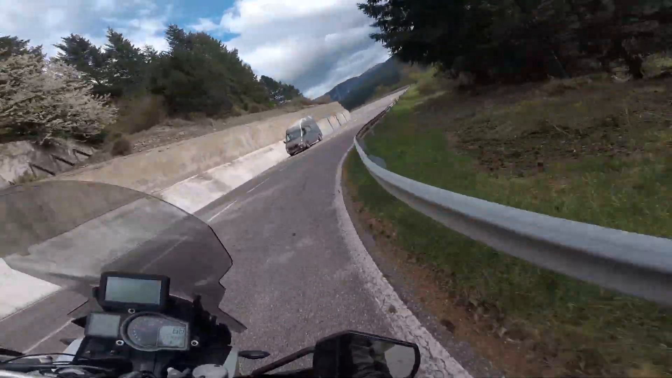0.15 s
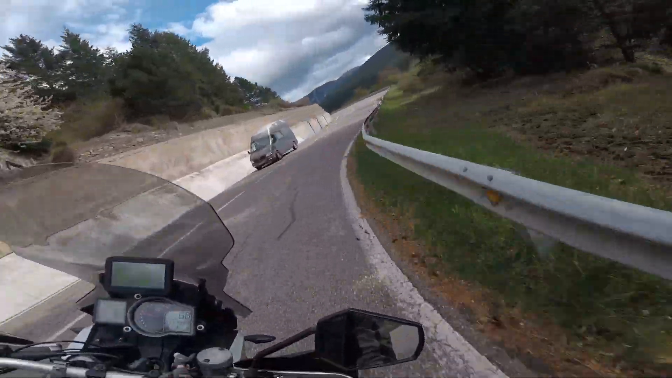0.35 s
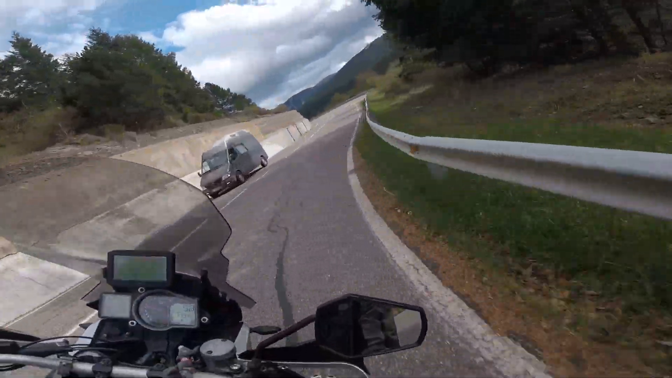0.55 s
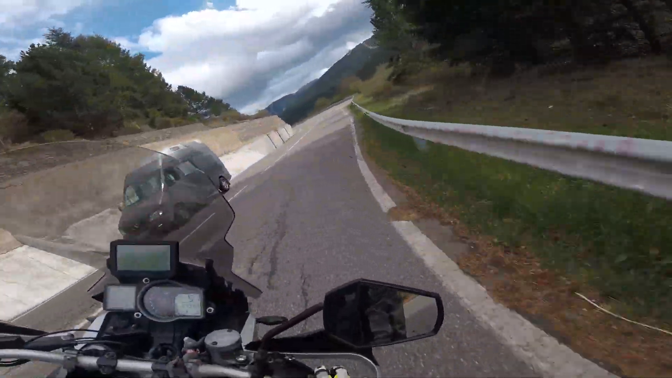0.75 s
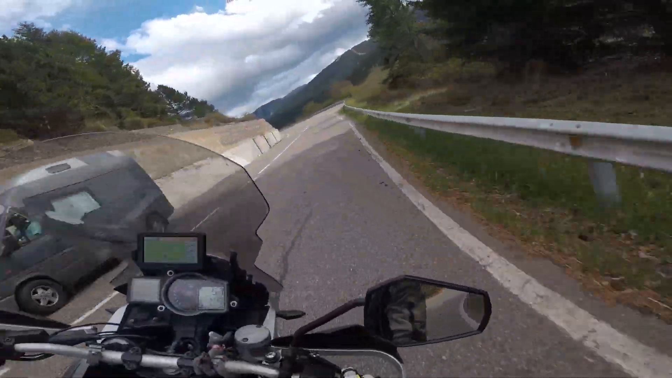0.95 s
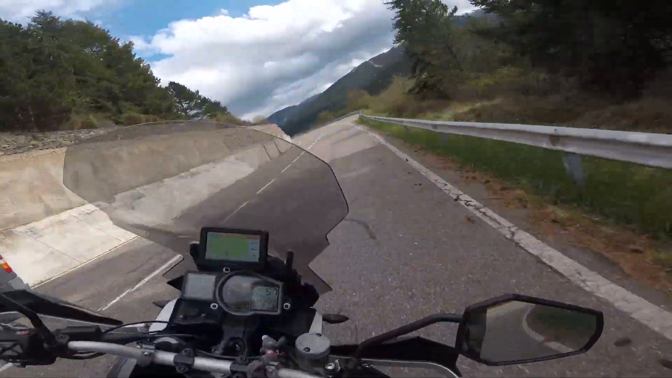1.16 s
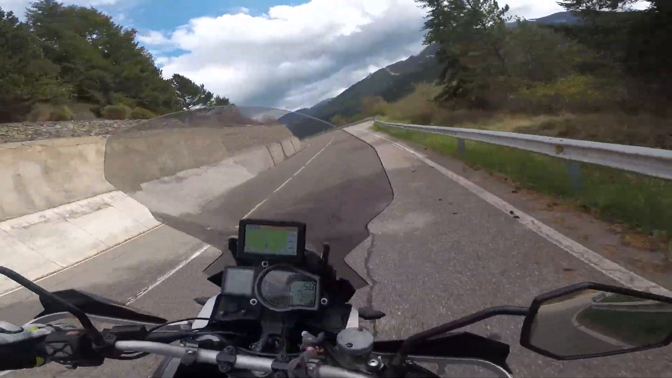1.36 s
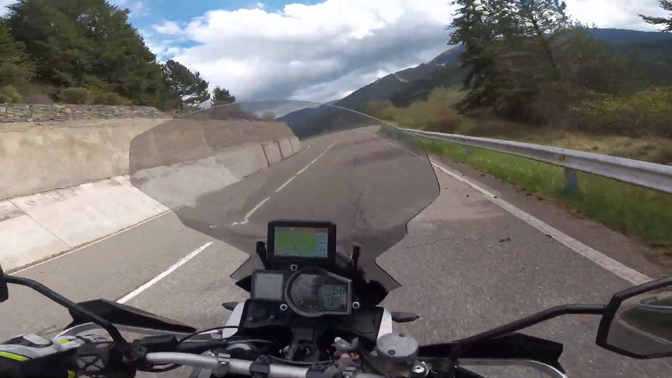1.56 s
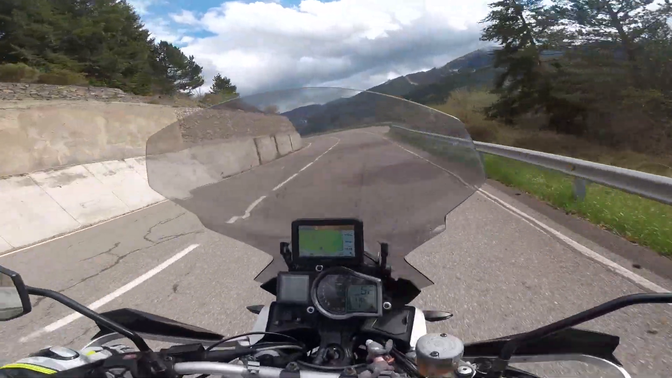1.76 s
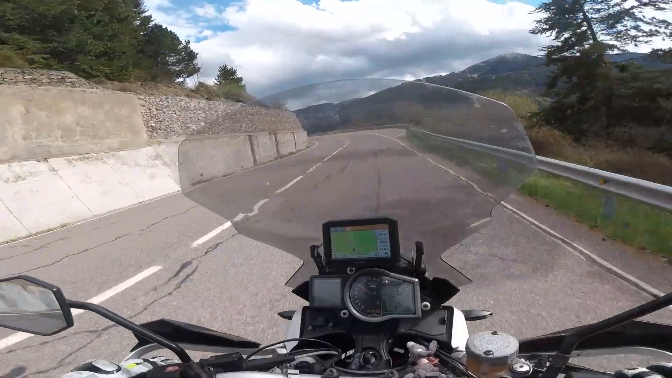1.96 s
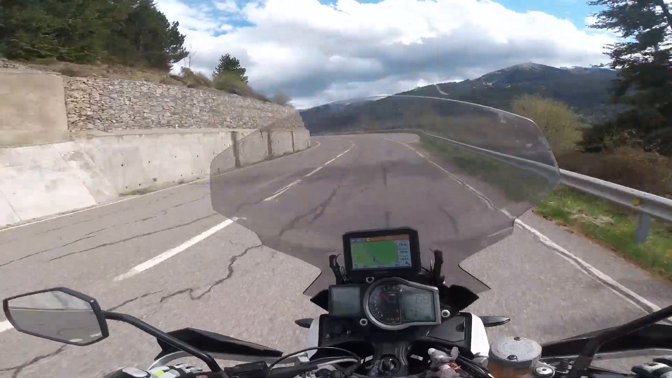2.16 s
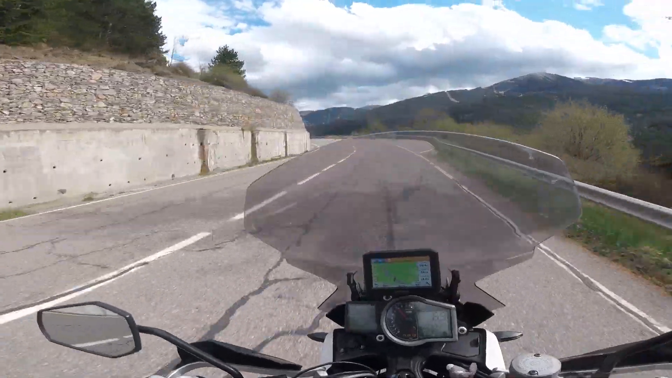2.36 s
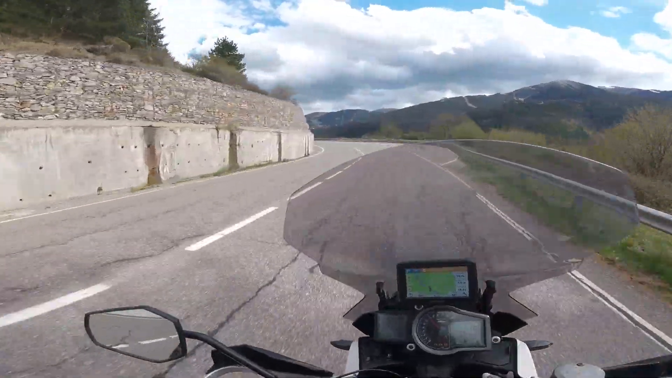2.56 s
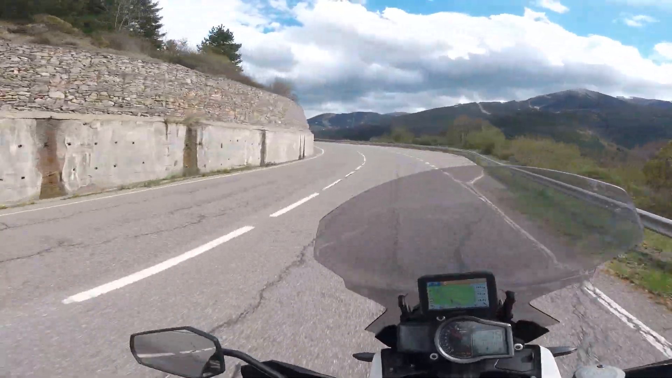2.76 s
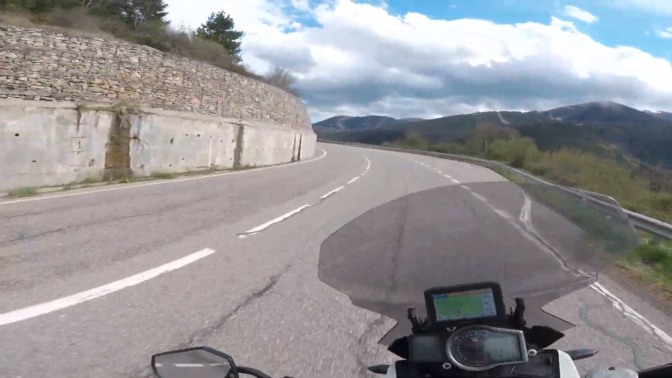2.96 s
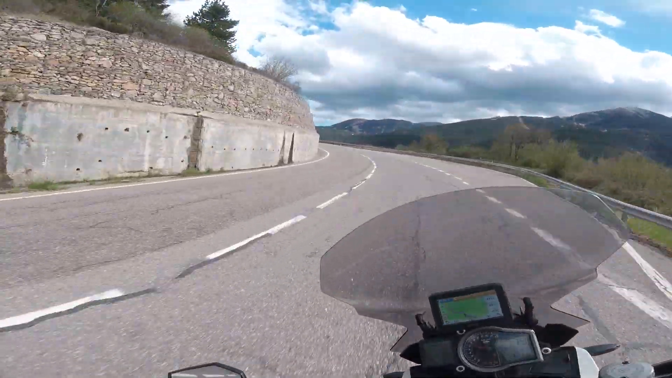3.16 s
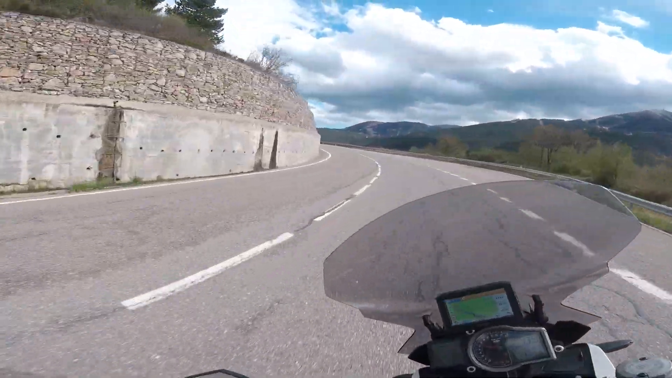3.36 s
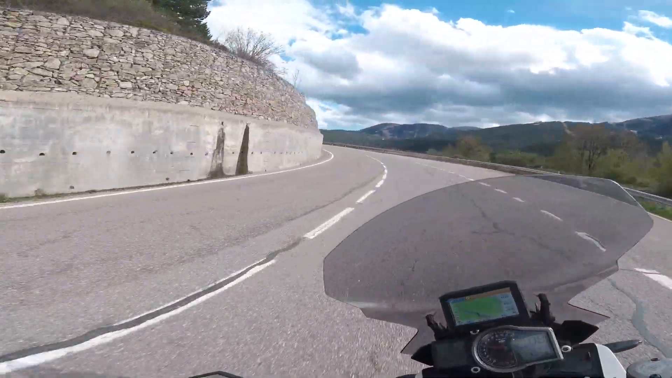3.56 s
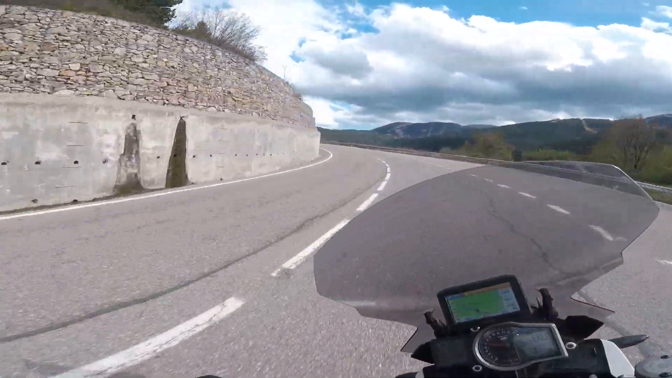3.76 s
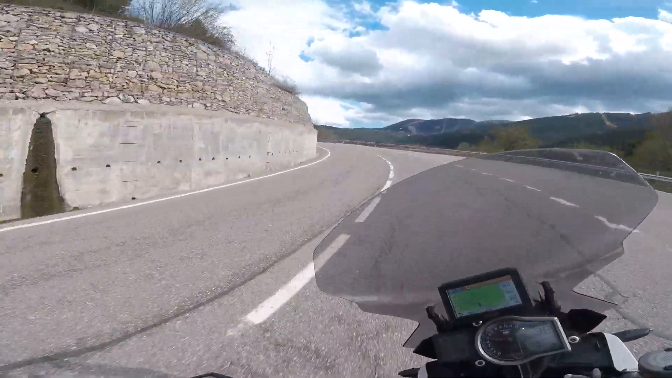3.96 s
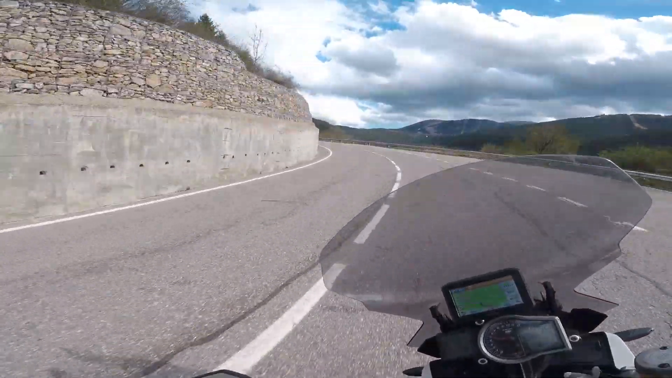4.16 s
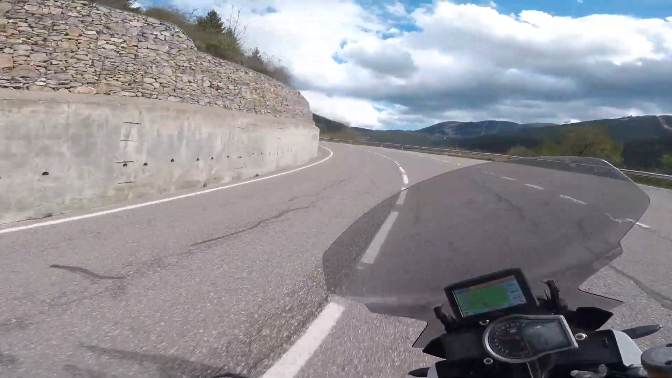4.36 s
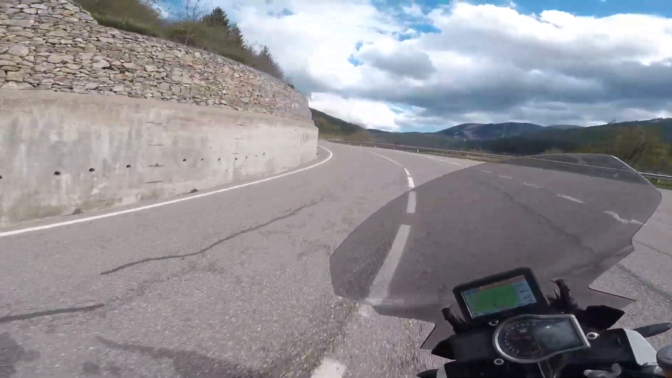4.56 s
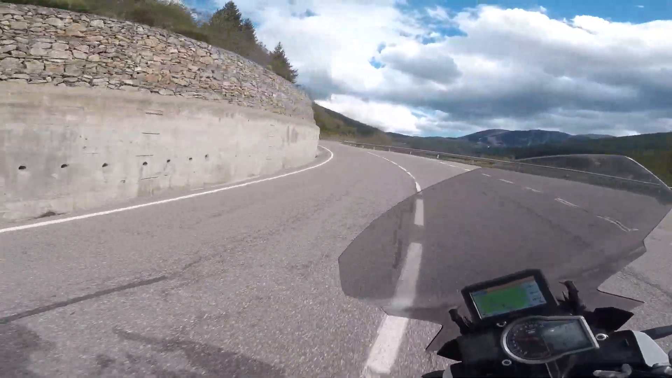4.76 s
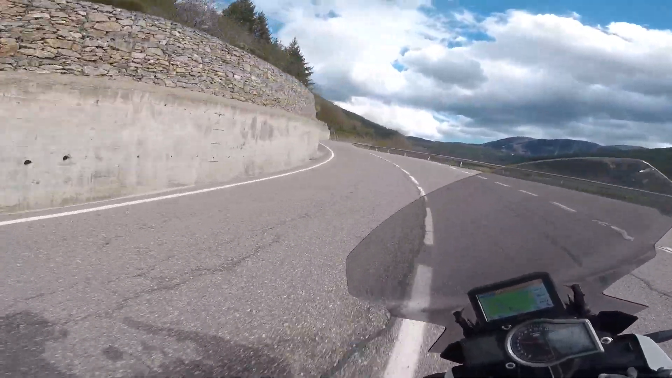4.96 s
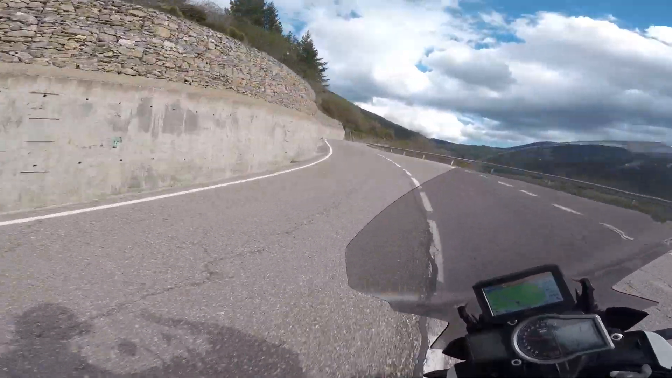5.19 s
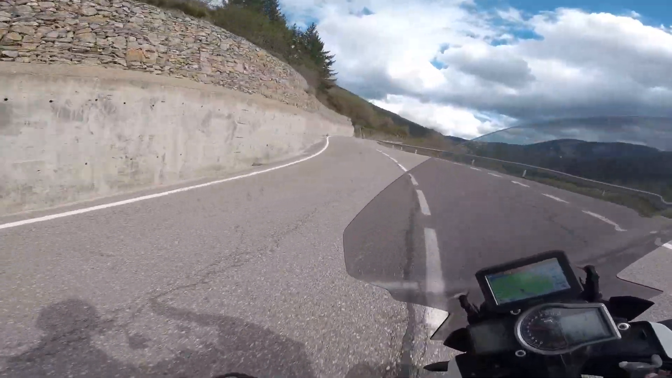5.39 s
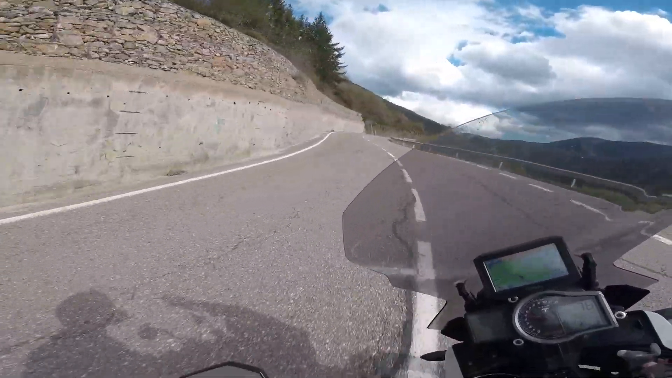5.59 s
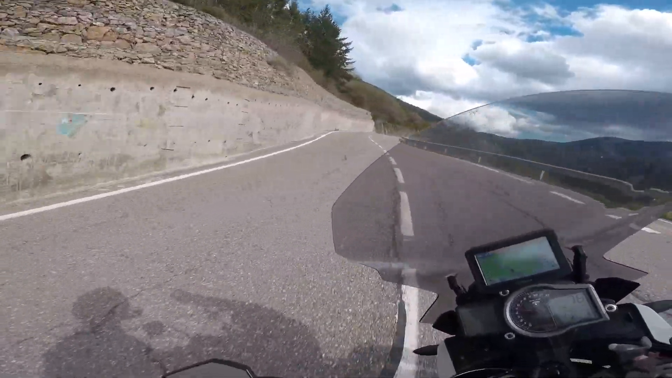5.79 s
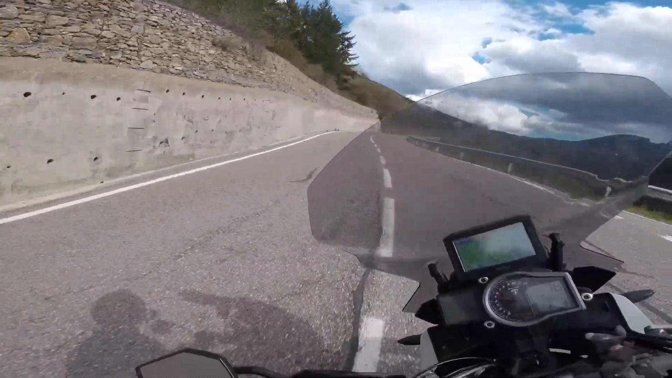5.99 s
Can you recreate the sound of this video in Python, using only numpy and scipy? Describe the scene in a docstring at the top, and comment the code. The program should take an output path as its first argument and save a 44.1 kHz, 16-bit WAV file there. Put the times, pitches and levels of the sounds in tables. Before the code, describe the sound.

From the rider's seat, a big V-twin motorcycle starts on a low, lumpy throb and accelerates hard, growing to a raspy bark. The throttle snaps shut, the gearbox thuds and exhaust pops scatter as revs drop. It coasts with a soft burble through an open mountain bend, tyres rushing and wind thumping the microphone, then the throttle opens again at steady low revs.

```python
"""A 75-degree V-twin motorcycle heard from the rider's seat pulls hard, shifts up, coasts and picks up again.
Two unevenly spaced gas pulses a cycle ring modes of the silencer, tailpipe, headers, heat shield and airbox.
Shaped noise gives the gas rasp behind each pulse, the overrun sputter, tyre rush, wind and wall hiss.
Rung impulses pop in the exhaust near throttle changes; decaying noise bursts thud and click in the gearbox.
Brief resonant swells follow the gas pulses; low, soft thumps buffet the microphone."""
import sys
import numpy as np
from scipy import signal
from scipy.fft import rfft, irfft, next_fast_len
from scipy.io import wavfile
from scipy.ndimage import uniform_filter1d

SR = 44100
rng = np.random.default_rng(int(sys.argv[2]) if len(sys.argv) > 2 else 0)


def master_out(mix):
    """Clip the mix to full scale and print it as 16-bit PCM to the path in sys.argv[1]."""
    frames = np.transpose(np.atleast_2d(mix))
    ceiling = np.clip(frames, -1, 1)
    pcm = np.round(ceiling * 32767).astype(np.int16)
    wavfile.write(sys.argv[1], SR, pcm)


N = 265923
TIME = np.arange(N) / SR
REAR_LAG_CYCLES = 285 / 720  # front cylinder's pulse to the rear one's
MIN_OPENING = 0.01  # keeps the logarithms finite
LEFT_RIGHT = np.array([[1], [-1]])

# engine speed, rocking on the drive chain at load changes: (time [s], four-stroke cycle rate [Hz])
ENGINE_SPEED = [(0.0, 34.96), (0.12, 35.22), (0.22, 37.82), (0.29, 33.82), (0.35, 36.2), (0.43, 35.28),
                (0.55, 36.31), (0.64, 36.72), (0.96, 40.4), (1.16, 44.23), (1.22, 43), (1.3, 45.8),
                (1.37, 45.48), (1.46, 47.64), (1.66, 49.52), (1.73, 51.24), (1.79, 51.55), (2.0, 55.3),
                (2.06, 56.1), (2.33, 56.75), (2.46, 48.5), (2.6, 39.63), (2.65, 43.48), (2.69, 41.14),
                (2.76, 42.6), (3.2, 41.95), (3.62, 40.71), (3.69, 40.76), (3.8, 40.27), (3.96, 40.9),
                (4.04, 39.7), (4.9, 38.5), (5.5, 38.87), (5.8, 39.33), (6.03, 40.15)]


def undb(db):
    """Decibels to gain."""
    return 10 ** (np.asarray(db) / 20)


def curves(table):
    """Each column of a table, joined by straight lines in time."""
    s, *columns = np.transpose(table)
    return [np.interp(TIME, s, column) for column in columns]


def noise(colour):
    """Noise of rms 1 with the given spectrum, interpolated in dB over log frequency."""
    hz, db = np.transpose(colour)
    size = next_fast_len(N, True)
    bins_hz = np.maximum(np.fft.rfftfreq(size, 1 / SR), 1)
    gain = undb(np.interp(np.log(bins_hz), np.log(hz), db))
    x = irfft(rfft(rng.standard_normal(size)) * gain, size)[:N]
    return x / x.std()


def walk(rate_hz):
    """Slow random curve with a spread near 1."""
    hold = int(SR / rate_hz)
    steps = np.repeat(rng.standard_normal(N // hold + 1), hold)
    smooth = uniform_filter1d(uniform_filter1d(steps, hold), hold)
    return 1.3 * smooth[:N]


def ring(x, hz, width_hz):
    """One resonance, gain 1 at its centre."""
    return signal.lfilter(*signal.iirpeak(hz, hz / width_hz, fs=SR), x)


def lowpass(x, hz, order):
    """Butterworth roll-off above hz."""
    return signal.sosfilt(signal.butter(order, hz, fs=SR, output="sos"), x)


def spread(colour, width, wide_hz):
    """Stereo noise: the bass is alike in both channels, the treble less so."""
    side = noise(colour)
    side = side - 0.85 * lowpass(side, wide_hz, order=1)
    return noise(colour) + width * side * LEFT_RIGHT


def controls():
    """Throttle opening (0-1) and revs in octaves above cruising."""
    # rider's hand: wide open, shut for the upshift and bend, fed back in: (time [s], opening [0-1])
    hand = [(0.0, 0), (0.15, 0.27), (0.27, 0.28), (0.6, 0.41), (0.77, 0.54), (1.0, 0.69), (1.09, 0.8),
            (1.35, 0.85), (1.7, 0.91), (2.05, 0.89), (2.19, 0.82), (2.32, 0.66), (2.44, 0.01), (3.66, 0.01),
            (3.8, 0.04), (3.96, 0.118), (4.1, 0.08), (4.65, 0.04), (5.12, 0.34), (5.68, 0.45), (6.03, 0.55)]
    cruise_hz = 40
    throttle, = curves(hand)
    cycle_hz, = curves(ENGINE_SPEED)
    return np.clip(throttle, 0, 1), np.log2(cycle_hz / cruise_hz)


def unevenness():
    """Scatter of pulse size in dB, largest at barely open throttle where the mixture burns badly."""
    base_db, stumble_db = -0.11, 1.5
    stumble_opening, stumble_width = 0.024, 0.18
    throttle, _ = controls()
    return base_db + stumble_db * np.exp(-((throttle - stumble_opening) / stumble_width) ** 2)


def clutch_unloading_db():
    """Drop of boom and hum as the clutch unloads the engine in mid-shift."""
    centre_s, half_s, drop_db = 2.526, 0.12, 2.5
    return drop_db * np.exp(-((TIME - centre_s) / half_s) ** 2)


def pulses(cycle, offset, scatter_db, burn):
    """One pulse per engine cycle, of unit area (in cycles) before uneven burning scales it."""
    marks = np.arange(int(cycle[-1]) + 1) + offset
    at = np.interp(marks[marks < cycle[-2]], cycle, np.arange(N))
    i = at.astype(int)
    area = undb(burn[:len(i)] * scatter_db[i]) / np.diff(cycle)[i]
    # share each pulse between its two neighbouring samples
    early = np.bincount(i, area * (1 - at + i), N)
    late = np.bincount(i + 1, area * (at - i), N)
    return early + late


def duct(modes, cycle, offset, drive_db, burns, edge_hz, turbulence):
    """Both cylinders ring a duct; a short puff of turbulent flow trails each pulse."""
    scatter_db = unevenness()
    sources = []
    for lag, burn in zip((0, REAR_LAG_CYCLES), burns.T):
        kick = pulses(cycle, offset + lag, scatter_db, burn) * undb(drive_db)
        puff = lowpass(kick, 40, order=1) * rng.standard_normal(N)
        sources.append(kick + turbulence * puff)
    front, rear = sources
    rung = sum(ring(a * front + b * rear, hz, width_hz) for hz, width_hz, a, b in modes)
    return lowpass(rung, edge_hz, order=4)


def boom_drive():
    """Silencer drive in dB: rises with revs, falls with load, dips at half throttle."""
    coast_db, db_per_octave, half_throttle_dip_db, load_drop_db = -37, 24, 3, 5.5
    throttle, revs = controls()
    load_db = half_throttle_dip_db * np.sin(np.pi * throttle) + load_drop_db * throttle
    return coast_db + db_per_octave * revs - load_db - clutch_unloading_db()


def drone_drive():
    """Tailpipe drive in dB: rises with throttle opening, falls with revs."""
    full_db, db_per_doubling, fall_db_per_octave = -26, 13.5, 24.5
    throttle, revs = controls()
    opening_octaves = np.log2(np.maximum(throttle, MIN_OPENING))
    return full_db + db_per_doubling * opening_octaves - fall_db_per_octave * revs


def bark_drive():
    """Header drive in dB: climbs with the throttle up to a full-bark opening."""
    full_db, full_opening, range_db = -26.5, 0.849, 61.5
    throttle, _ = controls()
    return full_db - range_db * np.maximum(1 - throttle / full_opening, 0)


def exhaust(cycle):
    """Blowdown rings headers, heat shield and tailpipe; the piston's push booms in the silencer later."""
    # duct resonances:
    # (centre [Hz], width [Hz], front-cylinder coupling [signed gain], rear-cylinder coupling [signed gain])
    silencer_modes = [(68.3, 25.3, 0.99, 0.63), (91.4, 109, -0.42, -0.172), (176.4, 54, 0.54, -0.15),
                      (216.3, 44.4, -0.74, 0.87), (225.2, 37.5, 0.49, -1.214), (262.9, 25.3, -0.48, 0.067),
                      (397.6, 68.3, 0.62, 0.324), (405.8, 45.3, -0.73, -0.33), (456.3, 21, 0.081, 0.14),
                      (588, 25, 0.034, -0.039)]
    tailpipe_modes = [(68.5, 28, 0.31, -0.1), (120, 38, -0.34, 0.26), (242, 97, -0.21, 0.28),
                      (300.2, 49.6, -0.52, -0.83), (364.9, 35.2, -0.71, -1.1), (381, 37.5, 0.709, 0.28),
                      (525, 44, 0.25, -0.0023), (557.5, 8.7, 0.23, -0.3), (581.4, 45, -0.14, -0.15),
                      (708.3, 35, 0.29, 0.18), (846, 28, 0.012, 0.043), (1040, 110, -0.035, -0.009)]
    header_modes = [(124, 16, -0.3, -0.13), (187.6, 113, 0.51, 0.19), (215.6, 71.6, -0.74, -0.6),
                    (365, 27, -0.33, 0.26), (436, 56, -0.086, -0.24), (590, 282, -0.24, 0.0066),
                    (654, 97, -0.26, -0.25), (675.3, 218, 0.63, 0.43), (708, 131, -0.415, -0.34),
                    (856, 35, -0.024, -0.027), (1000, 90, -0.028, -0.003), (1101, 94, 0.042, 0.032),
                    (1310, 207, -0.017, -0.001), (1930, 73, 0.0066, 0.042)]
    shield_modes = [(1124, 49, -.02, -.012), (1195, 64, -.011, -0.0018), (1306, 71, -.007, -.005),
                    (1460, 140, -.003, -.002), (1810, 45, -0.0042, -.004), (1880, 35, -.003, 0.0035)]
    boom_at, drone_at, bark_at = 0.22, 0.087, 0.097  # cycles
    bark_db = bark_drive()
    burns = rng.standard_normal((int(cycle[-1]) + 1, 2))  # each firing's luck, per cylinder
    boom = duct(silencer_modes, cycle, boom_at, boom_drive(), burns, edge_hz=1170, turbulence=0.71)
    drone = duct(tailpipe_modes, cycle, drone_at, drone_drive(), burns, edge_hz=860, turbulence=0.098)
    bark = duct(header_modes, cycle, bark_at, bark_db, burns, edge_hz=970, turbulence=0.35)
    buzz = duct(shield_modes, cycle, bark_at, bark_db, burns, edge_hz=2800, turbulence=0.1)
    return boom + drone + bark + buzz


def airbox(cycle):
    """Pulses ring the airbox modes; the hum fades as the throttle opens wide."""
    # airbox resonances:
    # (centre [Hz], width [Hz], front-cylinder coupling [signed gain], rear-cylinder coupling [signed gain])
    airbox_modes = [(98, 28, 0.051, 0.91), (232.4, 18, -1.45, 0.8), (262.3, 18.2, 1.293, -1.4),
                    (333, 30, -0.36, -0.4), (346, 13, 0.38, -0.16), (560, 54, 0.11, 0.16)]
    base_db, db_per_octave, load_drop_db = -34.5, 23, 27.5
    half_gain_opening, draw_at_cycles = 0.076, 0.2204
    throttle, revs = controls()
    flow = np.maximum(throttle, MIN_OPENING)
    opening_db = 20 * np.log10(flow / (flow + half_gain_opening)) - load_drop_db * throttle
    hum_db = base_db + db_per_octave * revs + opening_db - clutch_unloading_db()
    burns = rng.standard_normal((int(cycle[-1]) + 1, 2))
    return duct(airbox_modes, cycle, draw_at_cycles, hum_db, burns, edge_hz=684, turbulence=0.3)


def sputter():
    """With the throttle shut, stray charges burn late in the pipe in soft, irregular puffs."""
    # sputter spectrum: (frequency [Hz], density [dB per Hz])
    sputter_colour = [(250, -18), (450, 2), (850, -9), (1300, -16), (2200, -31), (3000, -29.5), (4200, -37),
                      (8000, -58.5)]
    level_db, scatter_db, stop_opening = -53.5, 1, 0.028
    throttle, _ = controls()
    puffs = undb(scatter_db * np.minimum(walk(90), 2))
    shut = np.exp(-(throttle / stop_opening) ** 2)
    return noise(sputter_colour) * puffs * undb(level_db) * shut


def rasp(cycle):
    """Gas hisses past each opening exhaust valve and decays within the cycle; the headers ring in it."""
    # gas spectrum: (frequency [Hz], density [dB per Hz])
    gas_colour = [(150, -21), (400, -12), (800, 3), (1150, 8), (1500, -7), (1830, -7.5), (2150, -13),
                  (3200, -20), (5000, -24), (7300, -35), (8600, -32.5), (10000, -42.5), (12000, -41.5),
                  (14000, -56.5)]
    full_db, range_db, fall_db_per_octave = -42, 32.5, 5
    opens_at_cycles, decay_cycles, steady, rear_share = 0.1, 0.32, 0.12, 0.48
    whistle_hz, whistle_width_hz, whistle_db, whistle_db_per_octave = 1820, 90, -14, 38
    closing_lag_s = 0.042
    gate = steady
    for lag, share in ((0, 1), (REAR_LAG_CYCLES, rear_share)):
        age_cycles = (cycle - opens_at_cycles - lag) % 1
        gate = gate + share * np.exp(-age_cycles / decay_cycles)
    gate = lowpass(gate, 700, order=1)
    gate = gate / np.sqrt(np.mean(gate ** 2))
    throttle, revs = controls()
    # flow follows an opening throttle at once, a closing one late
    flow = np.maximum(throttle, lowpass(throttle, 1 / (2 * np.pi * closing_lag_s), order=1))
    level_db = full_db - range_db * (1 - flow) - fall_db_per_octave * revs
    gas = spread(gas_colour, width=0.55, wide_hz=1900) * gate * undb(level_db)
    whistle = ring(gas, whistle_hz, whistle_width_hz)
    return gas + undb(whistle_db + whistle_db_per_octave * revs) * whistle


def wind():
    """Low-frequency noise whose level follows the wind and flutters in quick gusts."""
    # wind on the microphone: (time [s], level [dB])
    wind_levels = [(0, -57), (.6, -49.5), (1.5, -46), (2.5, -49), (3.05, -37.5), (3.6, -42), (4.35, -46.5),
                   (4.55, -44), (6.03, -40)]
    # wind spectrum: (frequency [Hz], density [dB per Hz])
    wind_colour = [(12, -12.5), (25, -6.5), (38, -1), (60, -5.5), (90, -11.5), (150, -34.5), (400, -50.5),
                   (1500, -81)]
    wind_db, = curves(wind_levels)
    return noise(wind_colour) * undb(wind_db + 0.6 * walk(16))


def road(cycle):
    """Tyres and engine cases rush louder with road speed and load, throbbing with the crank."""
    # tyre and case spectrum: (frequency [Hz], density [dB per Hz])
    road_colour = [(40, -12), (100, -6.5), (300, 3.5), (520, -1), (800, -6), (1180, -19.5), (1500, -21),
                   (2250, -31.5), (2950, -31), (3900, -38), (4900, -42), (6300, -47.5), (7500, -56.5),
                   (11000, -73)]
    coast_db, load_db, db_per_octave, flutter_db = -45.5, 11.5, 2, 0.5
    shift_s, gear_step = (2.32, 2.59), 1.37  # start and end; ratio between the gears
    throttle, revs = controls()
    gear_octaves = np.interp(TIME, shift_s, (np.log2(gear_step), 0))
    road_speed = revs - gear_octaves  # octaves above cruising
    road_db = coast_db + load_db * throttle ** 2 + db_per_octave * road_speed
    throb = 1 + 0.1 * np.cos(2 * np.pi * 2 * cycle)  # two crank turns a cycle
    rush = spread(road_colour, width=0.92, wide_hz=1700)
    return rush * throb * undb(road_db + flutter_db * walk(24))


def wall():
    """Thin hiss thrown back by a retaining wall, growing steadily as the bike nears it."""
    # reflected hiss spectrum: (frequency [Hz], density [dB per Hz])
    hiss_colour = [(1500, -11.5), (2000, 0.5), (2800, 0), (4800, 2.5), (6500, -6), (9000, -24)]
    nearest_s, nearest_db, db_per_s = 7.45, -65.5, 5  # nearest point lies past the end
    level_db = nearest_db - db_per_s * np.abs(TIME - nearest_s)
    return spread(hiss_colour, width=0.7, wide_hz=1700) * undb(level_db)


def swells(cycle):
    """While the throttle moves, the gas pulses briefly pump up one low resonance."""
    # swells: (time [s], half length [s], centre [Hz], drive [dB])
    swell_table = [(0.088, 0.22, 94.665, -49), (0.192, 0.039, 300, -50.26), (1.162, 0.15, 356.111, -37),
                   (2.154, 0.16, 278, -35.5), (2.421, 0.019, 234, -46), (3.8, 0.053, 262, -42.5),
                   (3.938, 0.068, 240, -47.03)]
    width_hz, draw_at_cycles = 26, 0.297
    scatter_db = unevenness()
    burns = rng.standard_normal((2, int(cycle[-1]) + 1))
    gulps = np.zeros(N)
    for lag, burn in zip((0, REAR_LAG_CYCLES), burns):
        gulps += pulses(cycle, draw_at_cycles + lag, scatter_db, burn)
    out = np.zeros(N)
    for s, half_s, hz, db in swell_table:
        envelope = undb(db) * np.exp(-((TIME - s) / half_s) ** 2)
        out += ring(gulps * envelope, hz, width_hz)
    return lowpass(out, 700, order=4)


def pops():
    """Unburnt fuel pops in the pipe: each impulse rings one damped resonance."""
    # exhaust pops: (time [s], peak level [dB], ring [Hz])
    pop_table = [(2.349, -32, 700.7), (2.383, -27, 269.5), (2.401, -30, 485), (2.63, -29, 442.4),
                 (2.64, -23, 239.8), (2.653, -25.5, 487), (2.673, -26, 231), (3.658, -26.5, 510),
                 (3.697, -34, 472), (3.733, -26, 320), (3.76, -28, 470.3), (3.777, -31, 273.6)]
    width_hz, length_s = 110, 0.05
    out = np.zeros(N)
    for s, db, hz in pop_table:
        impulse = signal.unit_impulse(N, int(s * SR))[:int((s + length_s) * SR)]
        pop = lowpass(ring(impulse, hz, width_hz), 740, order=5)
        out[:len(pop)] += undb(db) * pop / np.abs(pop).max()
    return out


def gearbox():
    """Gear dogs part and meet: one noise burst drives a faint click and a louder, dull case thud."""
    # gear-dog clicks: (time [s], peak level [dB])
    click_table = [(2.392, -61), (2.62, -68), (2.657, -61), (2.705, -68)]
    decay_s, case_hz, case_width_hz, thud_db = 0.01, 620, 300, -36
    age_s = TIME[:SR // 20]
    out = np.zeros(N)
    for s, db in click_table:
        rattle = rng.standard_normal(len(age_s)) * np.exp(-age_s / decay_s)
        click = lowpass(ring(rattle, 3600, 4500), 7000, order=4)
        thud = lowpass(ring(rattle, case_hz, case_width_hz), 850, order=4)
        knock = undb(db) * click / np.abs(click).max() + undb(thud_db) * thud / np.abs(thud).max()
        out[int(s * SR):][:len(age_s)] += knock
    return out


def buffets():
    """An eddy off the windscreen hits the microphone as a soft, low thump."""
    # single buffets: (time [s], peak level [dB])
    buffet_table = [(2.72, -31), (2.82, -33), (2.955, -31), (3.14, -33), (4.549, -29.5), (4.925, -34),
                    (5.255, -32.5)]
    centre_hz, width_hz, rise_s = 48, 30, 0.011
    age_s = TIME[:SR // 5]
    out = np.zeros(N)
    for s, db in buffet_table:
        eddy = lowpass(ring(rng.standard_normal(SR), centre_hz, width_hz), 67, order=4)
        eddy = eddy[-len(age_s):]  # filters have settled
        thump = eddy * age_s / rise_s * np.exp(-age_s / rise_s)
        out[int(s * SR):][:len(age_s)] += undb(db) * thump / np.abs(thump).max()
    return out


def scene():
    """Integrated engine speed times the pulses, rasp and crank throb; all layers mix in stereo."""
    cycle_hz, = curves(ENGINE_SPEED)
    cycle = np.cumsum(cycle_hz) / SR
    pipe = exhaust(cycle) + airbox(cycle) + sputter() + swells(cycle) + pops() + gearbox()
    # the rider's body shades the sides differently: bass leans right, the middle range left
    bass = lowpass(pipe, 380, order=1)
    engine = pipe + (0.07 * pipe - 0.25 * bass) * LEFT_RIGHT
    air = (wind() + buffets() + road(cycle)) * undb(-0.6 * LEFT_RIGHT)
    return engine + rasp(cycle) + air + wall()


def record(dry):
    """An elliptic low-pass cuts the top; the last milliseconds fade."""
    top_hz, fade_s = 12600, 0.003
    fade = np.minimum((TIME[-1] - TIME) / fade_s, 1)
    return signal.sosfilt(signal.ellip(8, 0.2, 70, top_hz, fs=SR, output="sos"), dry * fade)


dry = scene()
out = record(dry)
master_out(out)
```